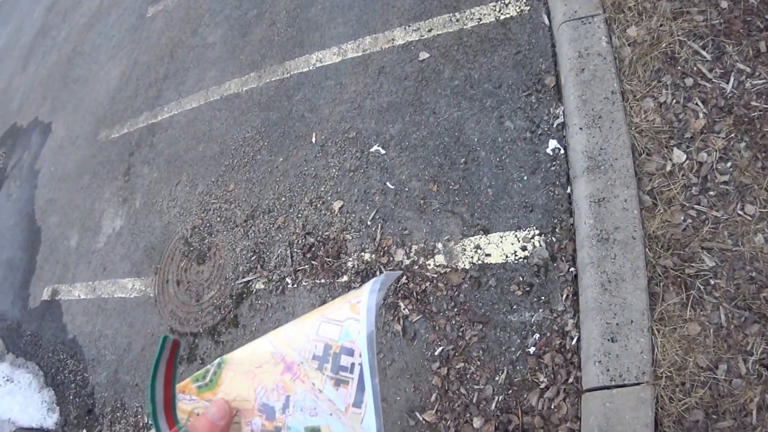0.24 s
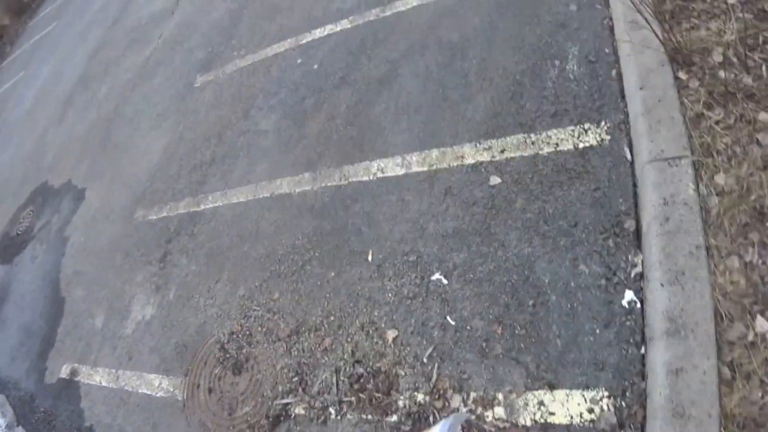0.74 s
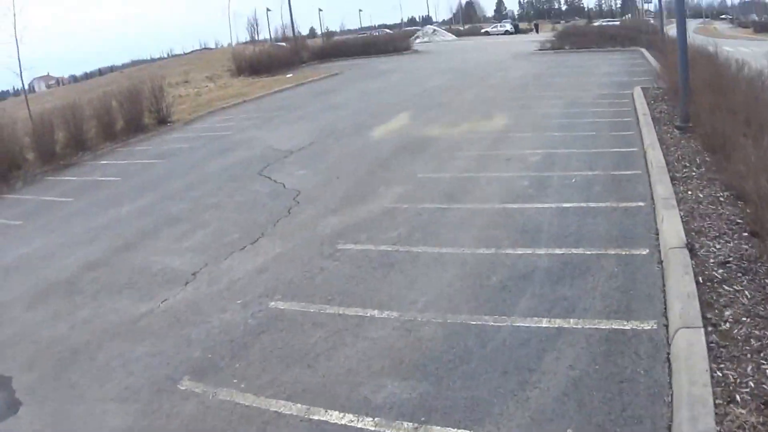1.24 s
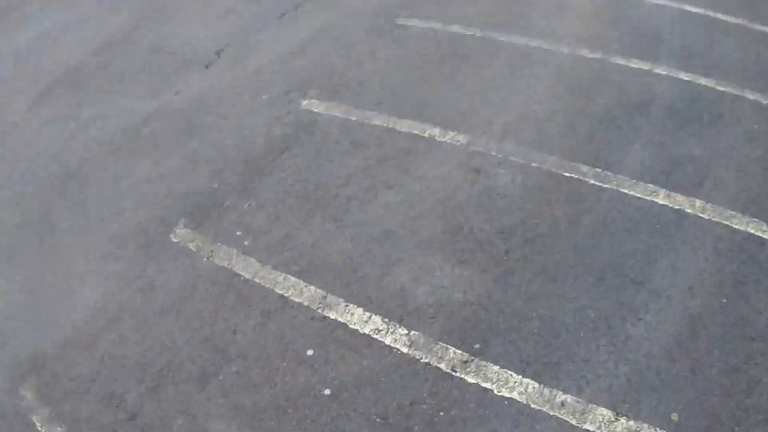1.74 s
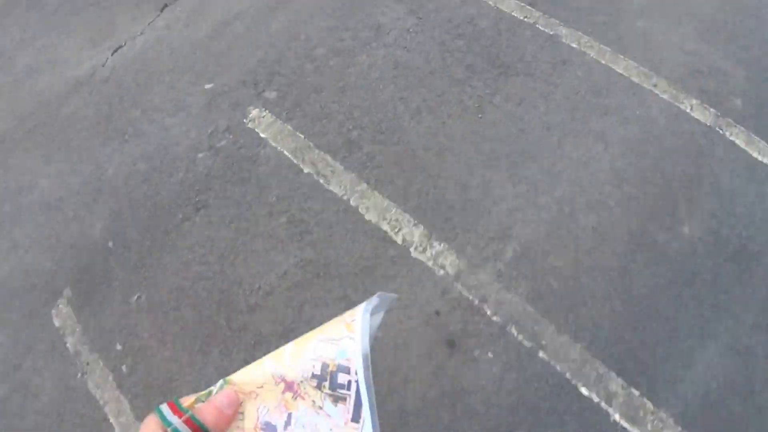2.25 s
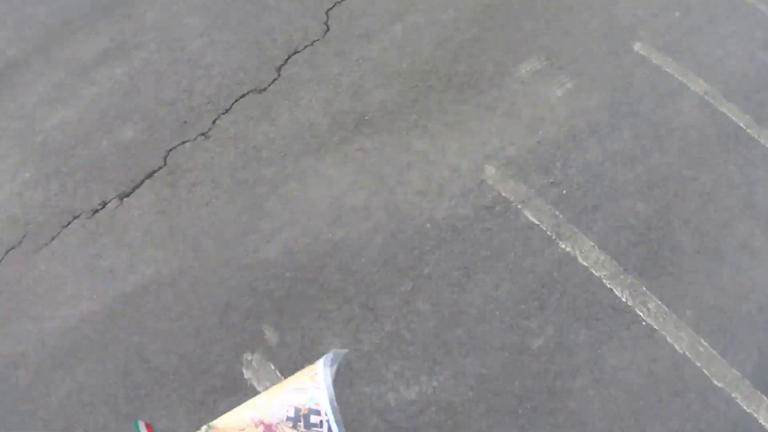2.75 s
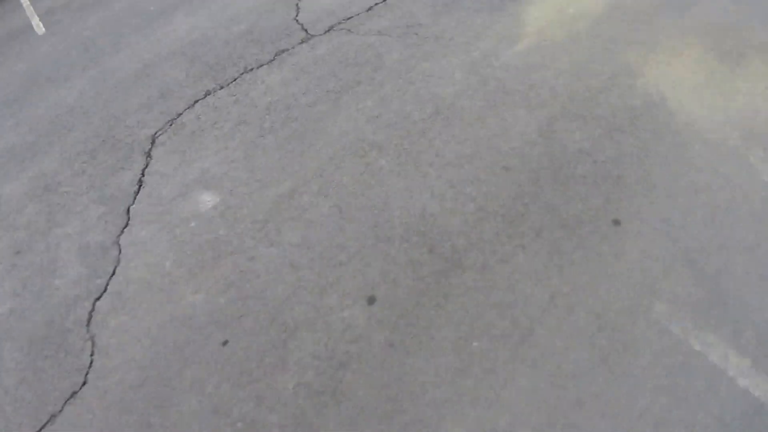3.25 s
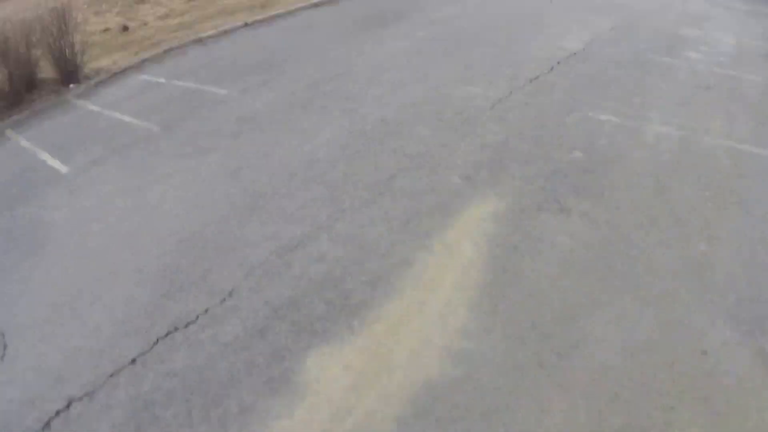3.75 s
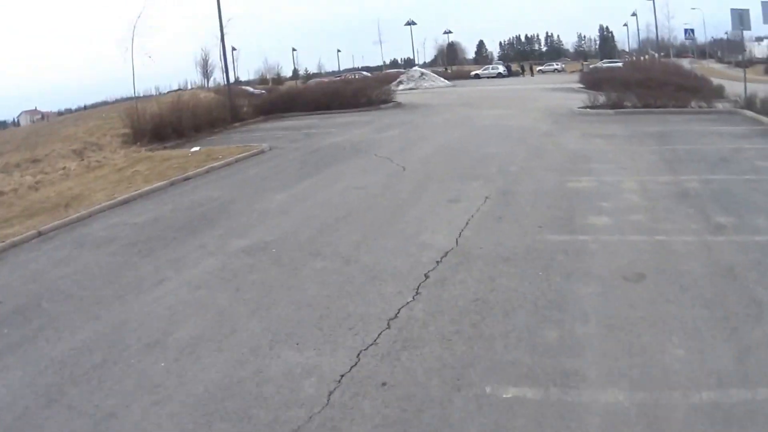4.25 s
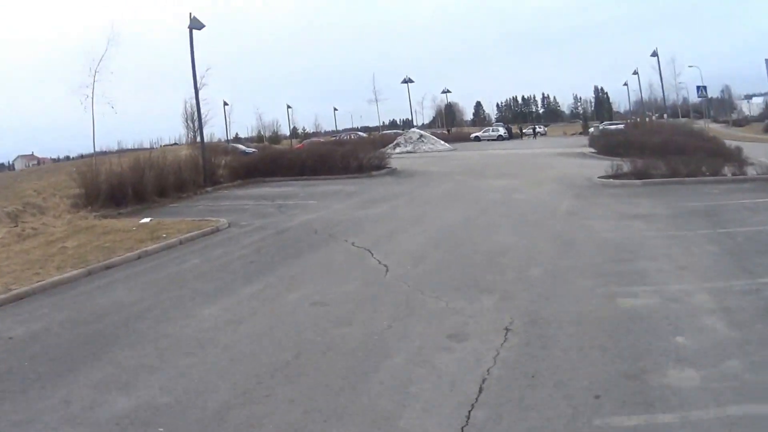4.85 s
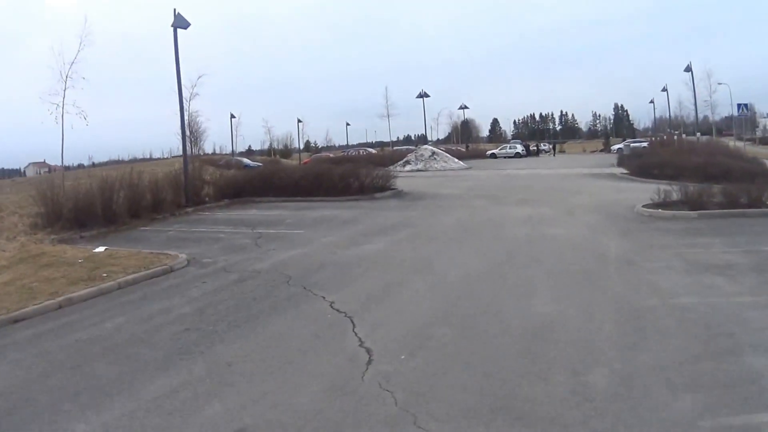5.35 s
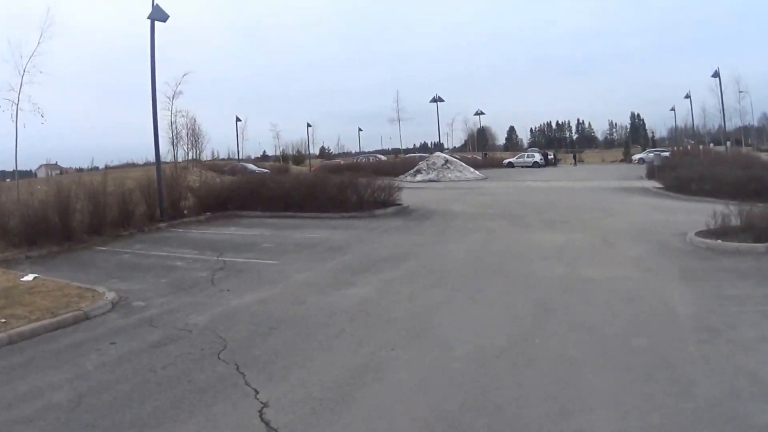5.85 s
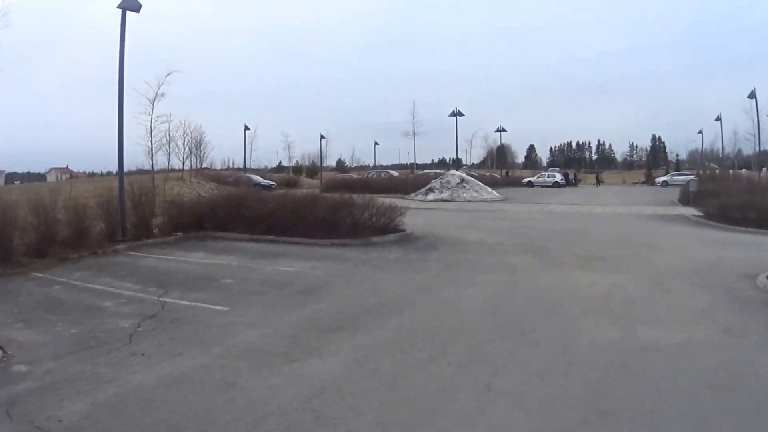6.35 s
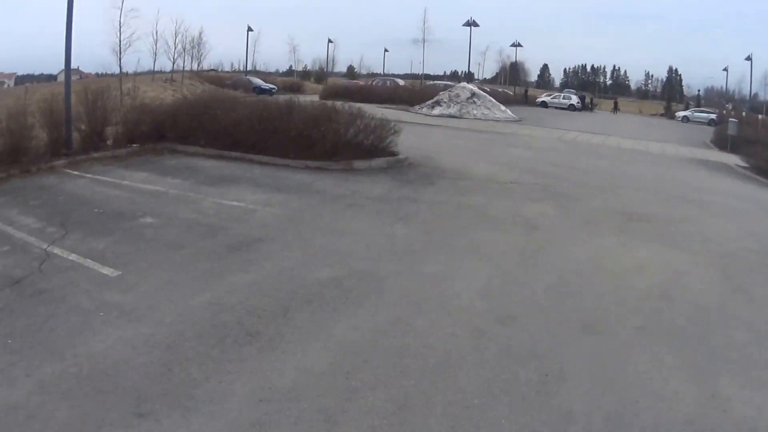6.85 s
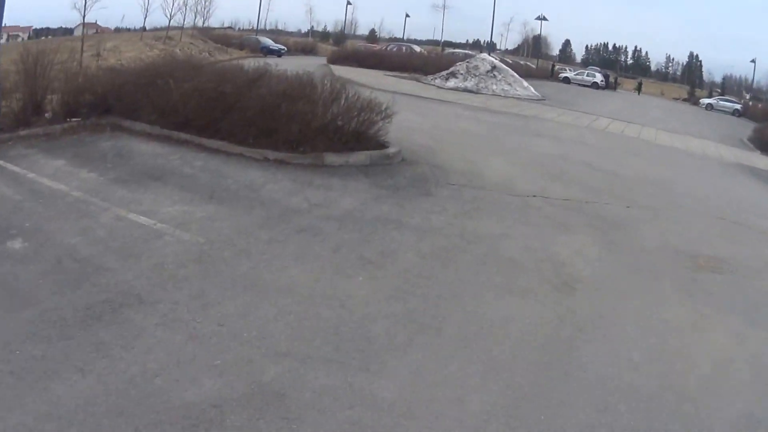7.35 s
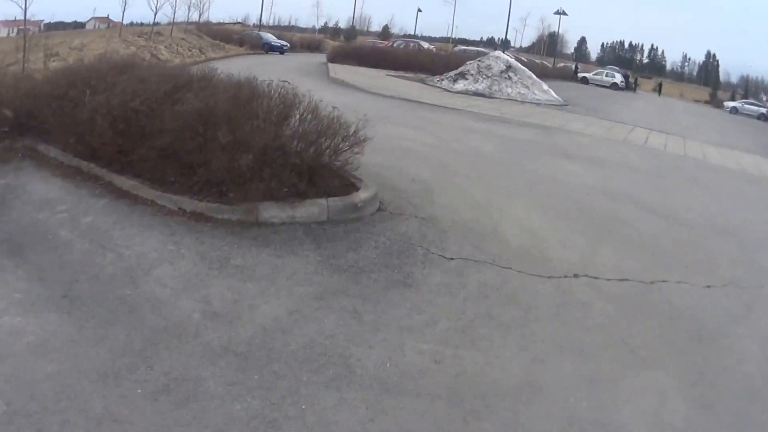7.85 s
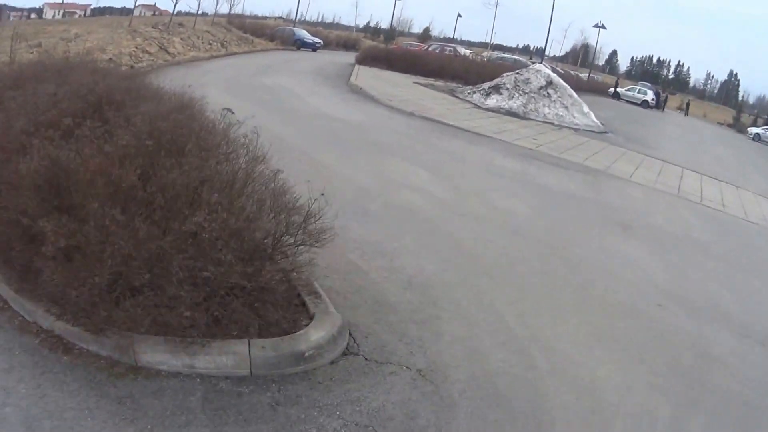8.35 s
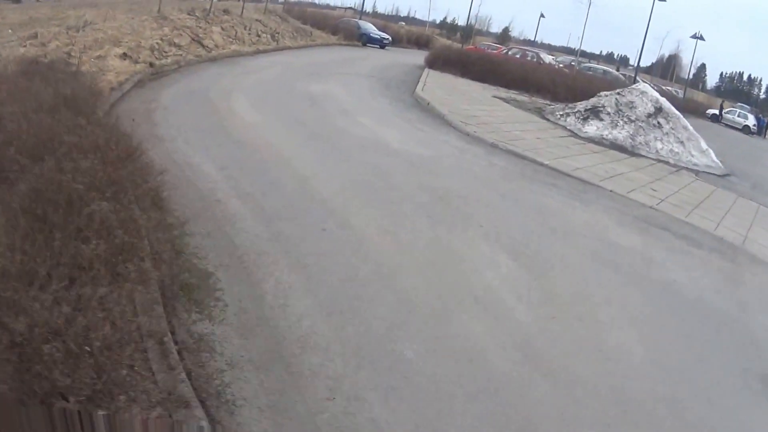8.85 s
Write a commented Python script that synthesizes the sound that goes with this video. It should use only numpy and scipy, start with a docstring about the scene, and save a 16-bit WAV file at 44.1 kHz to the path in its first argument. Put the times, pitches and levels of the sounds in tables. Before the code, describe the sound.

Wind buffets a body-worn microphone, then a runner sets off across asphalt, shoes slapping steadily while sleeve and strap rasp and rattle the plastic case.

```python
"""Runner with a body-worn camera

A runner sets off across an asphalt car park with a small camera worn on the body.
Each arm swing rubs a sleeve out and back over the plastic case, and each landing tugs its strap;
this friction rings the resonances of the case, and small loose parts and stones click.
Shoes slap and crush grit on the asphalt; filtered noise makes the wind on the microphone ports and faint air."""
import sys
import numpy as np
from scipy import signal
from scipy.fft import rfft, irfft, next_fast_len
from scipy.io import wavfile
from scipy.ndimage import uniform_filter1d

SR = 44100
rng = np.random.default_rng(int(sys.argv[2]) if len(sys.argv) > 2 else 0)


def master_out(mix):
    """Clip the mix to full scale and print it as 16-bit PCM to the path in sys.argv[1]."""
    frames = np.transpose(np.atleast_2d(mix))
    ceiling = np.clip(frames, -1, 1)
    pcm = np.round(ceiling * 32767).astype(np.int16)
    wavfile.write(sys.argv[1], SR, pcm)


N = 400869
T = np.arange(N) / SR  # time of each sample, in seconds
SIZE = next_fast_len(N + 8192, True)  # length of the Fourier transforms, in samples
HZ = np.maximum(np.arange(SIZE // 2 + 1) * SR / SIZE, 1)  # their frequencies

# Levels in all tables are relative: gains and other settings of a layer come on top.
# Landings, each with a tug of the strap just before the sole comes flat:
# [t/s, shoe level/dB, tug lead/s, tug length/s, tug level/dB]
LANDINGS = [(2.187, -28, 0.0034, 0.0013, -30), (2.502, -63, 0.048, 0.013, -15.5),
            (2.817, -28, .002, 0.0023, -18.5), (3.17, -45, .036, 0.0143, -14),
            (3.499, -46, 0.022, 0.01, -11), (3.829, -18.5, .020, 0.022, -15.5),
            (4.183, -33, 0.011, 0.0064, -18.5), (4.505, -8.5, 0.02, 0.014, -12.5),
            (4.852, -20, 0.029, .012, -15.5), (5.178, -7, 0.019, 0.016, -12.5),
            (5.511, -15.5, 0.029, 0.024, -16), (5.832, -8.5, 0.024, 0.021, -14),
            (6.176, -13, 0.022, 0.0066, -14), (6.497, -6.5, 0.026, 0.018, -13.5),
            (6.829, -32, .017, 0.013, -15.5), (7.156, -10, .012, 0.014, -14),
            (7.478, -21, .017, 0.0096, -12.5), (7.804, -8, 0.014, 0.0095, -13),
            (8.137, -17.5, .021, 0.0069, -18.5), (8.458, -14, .024, .014, -12.5),
            (8.786, -20, 0.013, 0.0064, -12.5)]
# Between landings an arm swings out and back, and the sleeve catches as each stroke begins:
# [t/s, out stroke length/s, out rub level/dB, out catch level/dB,
#  back stroke delay/s, back rub level/dB, back catch level/dB, treble of the swing/dB]
ARM_SWINGS = [(1.999, 0.042, -31, -22.5, 0.093, -30, -18.5, 3),
              (2.299, 0.048, -34, -34, 0.1, -29.5, -17, -2),
              (2.683, 0.04, -26.5, -23, 0.051, -33, -32, 3.5),
              (2.983, 0.046, -29.5, -50, 0.1, -31.5, -22, -0.5),
              (3.342, 0.049, -25, -24.5, 0.069, -30, -30, 2),
              (3.662, 0.038, -28, -35, .088, -28.5, -50, -0.5),
              (4.006, 0.036, -21.5, -32, 0.059, -27, -28, 1.5),
              (4.291, 0.087, -28, -24.5, 0.13, -28, -32, -1),
              (4.665, 0.034, -24.5, -23, 0.058, -26.5, -27.5, 2),
              (4.992, 0.031, -24.5, -24, 0.092, -29, -52, 0.5),
              (5.327, .06, -24.5, -15.5, 0.065, -27.5, -29, 1),
              (5.653, 0.04, -23.5, -31, .088, -30.5, -54, -2.5),
              (5.987, .06, -25, -16, 0.068, -24, -40, 3.5),
              (6.306, 0.061, -29, -49.5, 0.09, -27.5, -29, 0.5),
              (6.645, .065, -26, -12.5, 0.097, -29, -17.5, 2),
              (6.948, 0.055, -29, -57.5, 0.11, -24, -32, 0),
              (7.297, 0.049, -23.5, -16.5, 0.076, -27.5, -33, 2.5),
              (7.626, 0.041, -24, -47, 0.093, -26.5, -21.5, 1),
              (7.952, 0.046, -23.5, -21, .098, -29.5, -14.5, 1),
              (8.282, 0.021, -27, -45.5, .089, -27.5, -19.5, 3.5),
              (8.609, 0.039, -24, -15, 0.1, -33, -14.5, 2), (8.902, 0.082, -33, -47, 0.13, -24, -19, 2)]
SLIP_REF_DB = -16  # a middling slip


def amp(db):
    """Decibels to gain: every 20 dB is a factor of ten."""
    return 10 ** (np.asarray(db) / 20)


def rms_one(x):
    """Scale to an rms (average strength) of 1."""
    return x / np.sqrt(np.mean(x ** 2) + 1e-20)


def in_time(rows):
    """Join (time, value) points by straight lines, sample by sample."""
    return np.interp(T, *np.transpose(rows))


def drift(rate):
    """Smooth chance with this many new random values a second; spread 1."""
    knots = rng.standard_normal(N // 10)
    return rms_one(np.interp(T * rate, np.arange(len(knots)), knots))


def coloured(points, channels):
    """Unrelated noises with a spectrum of (Hz, relative dB) points; rms 1."""
    hz, level_db = np.transpose(points)
    gain = amp(np.interp(np.log(HZ), np.log(hz), level_db))
    spectrum = rfft(rng.standard_normal((channels, SIZE))) * gain
    return rms_one(irfft(spectrum)[:, :N])


def swell(s, length_s, attack_s, release_s):
    """A push that grows exponentially, holds at height 1 and dies away."""
    out = np.zeros(N)
    span = slice(max(int(s * SR) - SR // 4, 0), int((s + length_s) * SR) + SR // 4)
    rise = np.minimum(T[span] - s, 0) / attack_s
    fall = np.maximum(T[span] - s - length_s, 0) / release_s
    out[span] = np.exp(rise - fall)
    return out


def open_air(level_db):
    """The faint air of the open car park: steady noise, unrelated at the two ports."""
    # spectrum of the air: [f/Hz, level/dB]
    air_colour = [(200, -19), (500, 3.5), (900, -5.5), (1400, -1), (1800, -10), (2600, -5), (5000, -12),
                  (9000, -12.5), (11000, -21)]
    return amp(level_db) * coloured(air_colour, channels=2)


def airflow():
    """Strength of the wind: an eddying breeze and separate gusts whose powers add."""
    # steady airflow over the ports: [t/s, level/dB]
    breeze_curve = [(0, -37.5), (0.6, -44), (1.3, -40.5), (1.85, -44.5), (3.1, -45.5), (3.4, -42.5),
                    (4.1, -31), (4.7, -40), (5.3, -38.5), (5.9, -36.5), (6.25, -40), (7.1, -30),
                    (7.8, -34.5), (8.25, -41.5), (9.09, -41)]
    # gusts on top of it: [t/s, length/s, level/dB]
    gust_rows = [(0.107, 0.056, -28), (0.205, 0.31, -27.5), (0.69, 0.077, -30.5), (0.802, 0.36, -26),
                 (1.138, 0.12, -26.5), (1.471, 0.2, -22.5), (1.999, 0.17, -34.5), (2.666, 0.045, -31.5),
                 (3.19, 0.051, -33.5), (3.281, .03, -22.5), (3.431, 0.054, -29), (3.658, .04, -23),
                 (4.189, .04, -27.5), (5.521, 0.021, -29.5), (7.042, 0.022, -21.5), (7.371, 0.078, -26),
                 (7.913, 0.038, -26.5), (8.522, .03, -30.5)]
    eddies_per_s, eddy_db = 18, 3
    breeze = amp(in_time(breeze_curve) + eddy_db * drift(eddies_per_s))
    power = breeze ** 2
    for s, length, level_db in gust_rows:
        gust = amp(level_db) * swell(s, length, attack_s=0.013, release_s=0.0067)
        power = power + gust ** 2
    return np.sqrt(power)


def wind(gain_db, side_db, buffet_db):
    """Eddies press on both ports nearly alike; strong gusts reach higher in pitch."""
    # spectrum of the wind rumble: [f/Hz, level/dB]
    wind_colour = [(15, -19), (30, -2), (55, 4), (100, 2), (170, -3), (230, -8.5), (340, -23), (500, -46),
                   (900, -73), (2000, -69)]
    gust = amp(gain_db) * airflow()
    mid, side = coloured(wind_colour, channels=2)
    # even out chance swells, so that mostly the airflow sets the strength
    local_power = uniform_filter1d(mid ** 2, SR // 20)
    mid = rms_one(mid / local_power ** .3)
    buffet_colour = [(60, -13), (150, 31), (250, -8), (360, -30), (550, -26), (1200, -50), (3000, -79)]
    buffet = coloured(buffet_colour, channels=1)
    rumble = gust * (mid + amp(side_db) * side * [[1], [-1]])
    # squaring makes the higher noise grow faster than the rumble
    flutter = gust ** 2 * amp(buffet_db) * buffet
    return (rumble + flutter) * amp([[-.4], [.4]])  # slightly stronger on the right


def buffets(gain_db, pulse_s, tail_s, tail_db):
    """An eddy bursts on the ports: one swing of pressure with a brief shudder around it."""
    # single hard buffets of wind: [t/s, level/dB]
    buffet_rows = [(0.12, -12.5), (0.324, -9), (0.442, -24), (0.697, -28), (0.856, -8), (0.888, -13),
                   (0.915, -14), (1.021, -18), (1.071, -13), (1.119, -9), (1.476, -12), (1.552, -8.5),
                   (1.579, -4.5), (1.636, -20), (3.675, -21)]
    out = np.zeros(N)
    shudder_colour = [(30, -22), (110, 14.0), (250, -8.0), (400, -22.0), (800, -63), (3000, -58)]
    shudder = coloured(shudder_colour, channels=1)[0]
    for s, level_db in buffet_rows:
        span = slice(int(s * SR) - SR // 20, int(s * SR) + SR // 10)
        t = T[span] - s
        u = t / (pulse_s * amp(rng.normal(0, 0.14)))  # widths differ very slightly
        swing = rng.choice([-1, 1]) * (1 - 2 * u * u) * np.exp(-u * u)
        tail = amp(tail_db) * shudder[span] * np.exp(-np.abs(t) / tail_s)
        out[span] += amp(level_db + gain_db) * (swing + tail)
    return out


def rub_level():
    """How hard the cloth rubs, in dB: light contact, two strokes per arm swing, a slide per landing."""
    # light contact of the cloth: [t/s, level/dB]
    contact = [(0, -60.5), (0.75, -55.5), (1.06, -46.5), (1.33, -43), (1.8, -45), (3, -49.5), (6.5, -44.5),
               (9.09, -39)]
    # stray brushes of the sleeve outside the rhythm: [t/s, length/s, level/dB]
    brushes = [(1.085, 0.031, -35), (1.386, .074, -28), (1.612, 0.057, -31), (1.7, 0.004, -30.5),
               (3.895, 0.013, -35.5), (4.2, 0.036, -27.5), (7.51, 0.018, -29.5)]
    slide_lag_s, back_stroke_s = 0.006, 0.028  # the cloth slides on just after it catches
    attack_s, release_s = 0.012, 0.01
    build_s, build_db = 0.061, -7.5  # the cloth tightens ahead of each swing
    # the case slides as the body sinks on a landing
    bounce_lead_s, bounce_s, bounce_db, bounce_release_s = 0.02, 0.038, -29.5, 0.0082

    strokes = list(brushes)
    power = amp(in_time(contact)) ** 2
    for s, length, out_db, _, back_s, back_db, *_ in ARM_SWINGS:
        strokes.append((s + slide_lag_s, length, out_db))
        strokes.append((s + back_s + slide_lag_s, back_stroke_s, back_db))
        power += (amp(out_db + build_db) * swell(s, 0, build_s, release_s)) ** 2
    for s, length, level_db in strokes:
        power += (amp(level_db) * swell(s, length, attack_s, release_s)) ** 2
    for s, _, _, _, tug_db in LANDINGS:
        slide = swell(s - bounce_lead_s, bounce_s, attack_s, bounce_release_s)
        power += (amp(bounce_db + (tug_db - SLIP_REF_DB) / 2) * slide) ** 2
    return 10 * np.log10(power)


def rubbing(level_db, gain_db, treble_db, touch_db, grain_db, grains_per_s):
    """Strength of soft sliding friction (low, high): a hiss of fibres that catch in clumps."""
    brightening, rub_ref_db = 0.23, -19  # harder rubbing is brighter, in dB per dB
    touch = 1 / (1 + np.exp((touch_db - level_db) / 3))  # the faintest contact is weakened further
    clumps = rms_one(amp(grain_db * drift(grains_per_s)))
    force = amp(level_db + gain_db) * touch * clumps
    return np.array([force, force * amp(treble_db + brightening * (level_db - rub_ref_db))])


def rasping(level_db, slow_hz, rise_hz, jitter, grip_db, spread_db):
    """Ribbed cloth sticks and slips in a train of small jerks, faster as it rubs harder."""
    grip = 1 / (2.5 + np.exp((grip_db - level_db) / 2))  # near 0 when light, at most 0.4
    per_s = (slow_hz + rise_hz * grip) * np.exp(jitter * drift(90))
    # one jerk each time the running count passes a whole number
    jerks = np.diff(np.floor(np.cumsum(per_s) / SR), prepend=0)
    return jerks * grip * amp(level_db + spread_db * drift(250))


def all_slips(rub_db):
    """Strap tugs, sleeve catches, knocks and chance snags: rows of (s, length s, level dB, treble dB)."""
    # further slips outside the rhythm, and a dull knock of the case as a foot lands at 3.176 s: [t/s, length/s,
    # level/dB, treble/dB]
    extra_slips = [(0.817, .004, -39, 0), (0.860, 0.002, -31, 19), (1.168, 0.0046, -27, 2),
                   (1.237, 0.0014, -20, 1.5), (1.255, 0.0021, -24, 2), (1.269, .002, -28, 1),
                   (1.381, 0.0027, -42, -2), (1.566, 0.0078, -24.5, -9), (1.614, 0.0066, -21.5, -4.5),
                   (2.121, 0.0075, -21.5, -28), (3.176, 0.0045, -15.5, -25), (3.692, 0.015, -21, -6.5),
                   (5.127, .011, -17, -4.5), (6.528, .0018, -25, -19.5), (7.130, .0044, -16, -4)]
    catch_s = 0.0053
    slip_treble_db, dulling = -2.5, 0.9  # harder slips are duller, in dB per dB
    # a landing knocks the case: half the shoe's dB is added to this level
    knock_lead_s, knock_s, knock_db, knock_treble_db = 0.006, 0.0055, -11, -20
    # small chance slips, level relative to the rubbing
    snags_per_s, snag_s, snag_db, snag_treble_db = 14, 0.0078, -2, 6

    catches = [(s - lead_s, length, level_db) for s, _, lead_s, length, level_db in LANDINGS]
    for s, _, _, out_db, back_s, _, back_db, _ in ARM_SWINGS:
        catches += [(s, catch_s, out_db), (s + back_s, catch_s, back_db)]
    slips = list(extra_slips)
    for s, length, level_db in catches:
        treble_db = slip_treble_db - dulling * (level_db - SLIP_REF_DB)
        slips.append((s, length, level_db, treble_db))
    for s, shoe_db, *_ in LANDINGS:
        slips.append((s - knock_lead_s, knock_s, knock_db + shoe_db / 2, knock_treble_db))
    for i in np.flatnonzero(rng.random(N - SR // 50) < snags_per_s / SR):
        slips.append((T[i], snag_s, rub_db[i] + snag_db, snag_treble_db))
    return slips


def slipping(slips, gain_db, snap_db, release_s, treble_db):
    """Each slip breaks loose with a snap, grates for its length and dies: (low, high) of both parts."""
    grate, snaps = np.zeros((2, N)), np.zeros((2, N))
    for s, length, level_db, bright_db in slips:
        at = int(s * SR)
        t = T[:min(SR // 10, N - at)]
        share = amp([0, bright_db + treble_db])
        force = amp(level_db + gain_db) * share / np.linalg.norm(share)
        grate[:, at:at + len(t)] += force[:, None] * np.exp(-np.maximum(t - length, 0) / release_s)
        snaps[:, at + SR // 1000] += force * amp(snap_db)  # one sample, a millisecond in
    return grate, snaps


def swing_treble(s):
    """Brightness at these times, in dB: it changes from swing to swing with the lie of the cloth."""
    return np.interp(s, [row[0] for row in ARM_SWINGS], [row[-1] for row in ARM_SWINGS])


def resonate(drives, modes, delay_s):
    """Forces ring the modes, each with its own balance and lag at the two ports; power is kept."""
    forces, out, power = rfft(drives, SIZE), 0, 0
    for k, (hz, width_hz, level_db, pan_db, lag) in enumerate(modes):
        detune = (HZ - hz * hz / HZ) / width_hz
        shape = amp(level_db) / (1 + 1j * np.sqrt(2) * detune - detune ** 2)  # flat top, steep skirts
        turn = lag + 2 * np.pi * (HZ - hz) * delay_s
        balance = rms_one(amp([[pan_db / 2], [-pan_db / 2]]))
        ports = balance * np.exp(-1j * np.outer([0, 1], turn))  # only the right port lags
        out = out + ports * (shape * forces[k % len(forces)])
        power += np.mean(np.abs(shape) ** 2)
    return irfft(out)[:, :N] / np.sqrt(power)


def case(rasp_low_db, rasp_high_db, rasp_grate_db, rasp_s):
    """Sliding, rasping and slips all ring the same plastic case, through its hollow and its shell."""
    # resonances of the hollow: [f/Hz, width/Hz, level/dB, left minus right/dB, right port's lag/rad]
    hollow = [(319, 300, -9, 0, 1.5), (766, 490, -14.5, 3, 4), (1368, 364, -3.5, 2.5, -0.32),
              (1810, 145, 2.5, -1.5, 0.5), (2280, 380, -2.5, -0.5, 1.37), (2740, 700, -23, 38, 8.5)]
    # resonances of the shell: [f/Hz, width/Hz, level/dB, left minus right/dB, right port's lag/rad]
    shell = [(3200, 1000, -5, -4, 0.84), (3928, 276, 5.5, -7, -2.24), (4154, 315, 5.5, 1, -1.83),
             (4630, 360, -2.5, 11, 0.73), (5050, 450, -4.5, -38.5, 0.2), (6245, 550, -3, -3, -2.5),
             (6910, 1400, -15.5, 4, 0), (7850, 760, -13.5, 2, 3.5), (9680, 760, -21, -2, 3.04)]
    rub_db = rub_level()
    rub = rubbing(rub_db, gain_db=0.24, treble_db=-7, touch_db=-64.0, grain_db=4.5, grains_per_s=700)
    slips = all_slips(rub_db)
    grate, snaps = slipping(slips, gain_db=-3.5, snap_db=22, release_s=0.0031, treble_db=-3)
    grate = grate * rms_one(amp(6.2 * drift(900)))  # roughened
    jerks = rasping(rub_db, slow_hz=73.6, rise_hz=117.5, jitter=0.28, grip_db=-32, spread_db=6.5)
    jerks = jerks * amp([[rasp_low_db], [rasp_high_db]])
    # each jerk grates on for about a millisecond
    rasp = amp(rasp_grate_db) * signal.lfilter([1], [1, -np.exp(-1 / (rasp_s * SR))], jerks + 1e-18)
    friction = np.sqrt(rub ** 2 + rasp ** 2 + grate ** 2)
    # the contact point wanders, so the hollow's modes get changing shares of the force
    shares = rms_one(amp(2.2 * np.array([drift(25) for _ in range(3)])))
    low = shares * (friction[0] * rng.standard_normal((3, N)) + snaps[0] + jerks[0])
    high = friction[1] * rng.standard_normal((3, N)) + snaps[1] + jerks[1]
    high = amp(swing_treble(T)) * high
    wander = amp(0.67 * drift(70) * np.array([[1], [-1]]))  # the contact moves between the two ports
    # a negative delay brings the right port ahead
    body = resonate(low, hollow, delay_s=0.0006) + resonate(high, shell, delay_s=-0.0005)
    return body * wander


def clicks(gain_db, ring_s, crack_db, crack_s):
    """A hard contact: a ring and a broad crack of a few milliseconds, unlike at the two ports."""
    # hard clicks of small loose parts and stones, and a dull bump of the case at 4.215 s: [t/s, level/dB,
    # middle of the random ring pitch f/Hz]
    click_rows = [(0.863, -29, 8300), (1.091, -28, 1130), (1.659, -15, 2390), (1.705, -25.5, 2510),
                  (1.841, -22.5, 2210), (2.273, -20.5, 2820), (2.803, -19.5, 2530), (3.115, -28, 3170),
                  (3.465, -41, 2480), (3.552, -17, 2620), (3.562, -21.5, 2340), (3.573, -21.5, 2200),
                  (3.793, -19, 2630), (4.215, -22.5, 880), (4.829, -16, 1730), (5.153, -30, 9600),
                  (5.47, -25.5, 2800), (5.59, -26.5, 973), (6.139, -21, 2120), (6.891, -27, 1980),
                  (7.126, -21, 2540), (7.776, -12, 2620), (8.577, -29, 2860), (8.756, -21, 2540)]
    out = np.zeros((2, N))
    hiss_colour = [(300, -35), (1300, 6.5), (3000, 3), (5000, -12.5), (11000, -26)]
    hiss = coloured(hiss_colour, channels=2)
    for s, level_db, hz in click_rows:
        span = slice(int(s * SR), int(s * SR) + SR // 20)
        t = T[span] - T[span][0]
        port_hz = hz * amp(rng.normal(0, 0.87, (2, 1)))  # a chance pitch at each port
        ring = np.sin(2 * np.pi * port_hz * t) * np.exp(-t / ring_s)
        crack = amp(crack_db) * hiss[:, span] * np.exp(-t / crack_s)
        out[:, span] += amp(level_db + gain_db) * (ring + crack)
    return out


def grit(level_db, lead_s, spread_s, grain_db):
    """The heel crushes loose sand just before the sole comes flat: a short swell of grainy noise."""
    # spectrum of grit crushed under a sole: [f/Hz, level/dB]
    grit_colour = [(300, -5.5), (1200, -6), (2600, -1), (3200, -10), (4000, -23), (6000, -17), (9000, -17),
                   (11000, -35)]
    press = sum(np.exp(-np.minimum(((T - s + lead_s) / spread_s) ** 2, 20)) for s, *_ in LANDINGS)
    grains = rms_one(amp(grain_db * drift(600)))
    return amp(level_db) * press * grains * coloured(grit_colour, channels=2)


def footsteps(start_hz, end_hz, fall_s, width_s, lag_s, pop_db, scuff_db, scuff_s):
    """The sole slaps flat: a very short pop that falls in pitch, then a dull scuff."""
    out, scuff = np.zeros((2, N)), np.zeros(N)
    for s, level_db, *_ in LANDINGS:
        span = slice(int(s * SR) - SR // 50, int(s * SR) + SR // 5)
        t = T[span] - s + np.array([[0], [-lag_s]])  # the pop is later at the right port
        # cycles so far, as the pitch glides from start_hz to end_hz
        turns = end_hz * t - (start_hz - end_hz) * fall_s * np.logaddexp(0, -t / fall_s)
        pop = np.sin(2 * np.pi * (turns + rng.random())) / np.cosh(t / width_s)
        out[:, span] += amp(level_db + pop_db) * pop
        # the scuff follows only half the shoe's dB
        fade = (t[0] > 0) * np.exp(-np.abs(t[0]) / scuff_s)
        scuff[span] += amp(level_db / 2 + scuff_db) * fade
    scuff_colour = [(60, -21), (250, -12), (600, -2), (1500, 7.5), (4000, -13), (10000, -53)]
    return out + scuff * coloured(scuff_colour, channels=2)


def scene():
    """Case noise, clicks, shoes and wind over the faint air of the open car park."""
    air = open_air(level_db=-53.5)
    gusts = wind(gain_db=3, side_db=-19.5, buffet_db=-13.5)
    bursts = buffets(gain_db=2.5, pulse_s=0.0016, tail_s=0.0072, tail_db=-2.0)
    rattle = case(rasp_low_db=11.5, rasp_high_db=5, rasp_grate_db=-17.5, rasp_s=0.0004)
    ticks = clicks(gain_db=4.5, ring_s=0.002, crack_db=-3.5, crack_s=0.003)
    sand = grit(level_db=-31.5, lead_s=0.027, spread_s=0.012, grain_db=4.0)
    shoes = footsteps(start_hz=546, end_hz=199, fall_s=0.0019, width_s=0.0011, lag_s=0.00048,
                      pop_db=0.5, scuff_db=-20.5, scuff_s=0.019)
    return air + gusts + bursts + rattle + ticks + sand + shoes


def record(dry):
    """Peaks are rounded and the top is cut."""
    cutoff_hz = 11200
    low_pass = signal.ellip(8, .3, 70, cutoff_hz, fs=SR, output="sos")
    return signal.sosfilt(low_pass, np.tanh(dry))


dry = scene()
out = record(dry)
master_out(out)
```